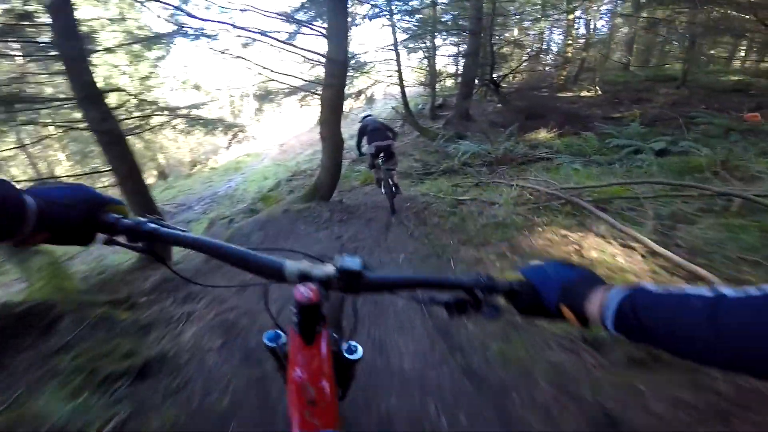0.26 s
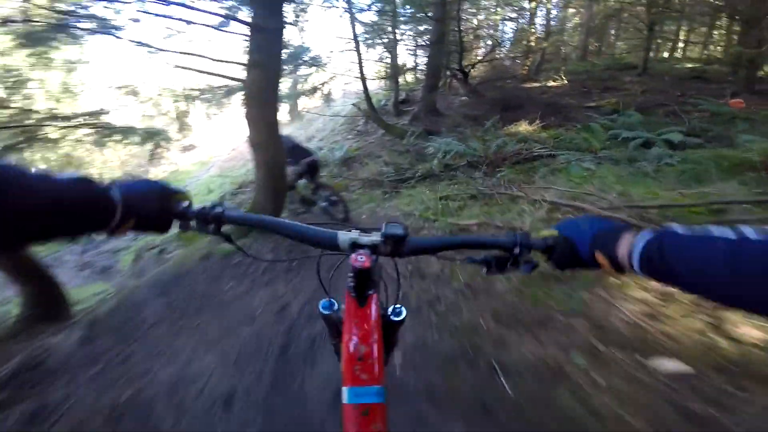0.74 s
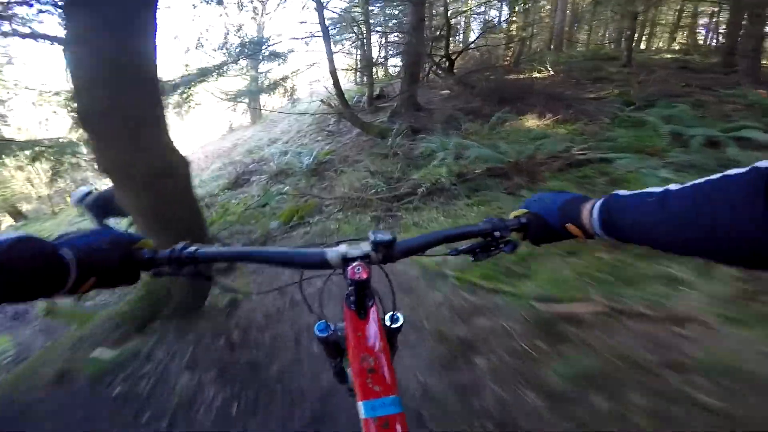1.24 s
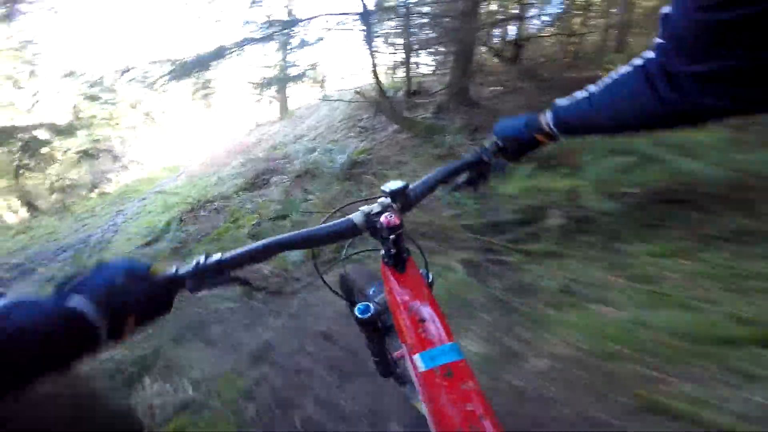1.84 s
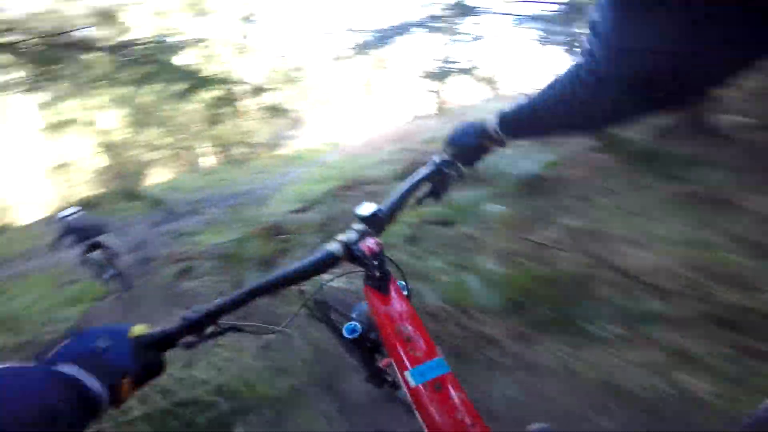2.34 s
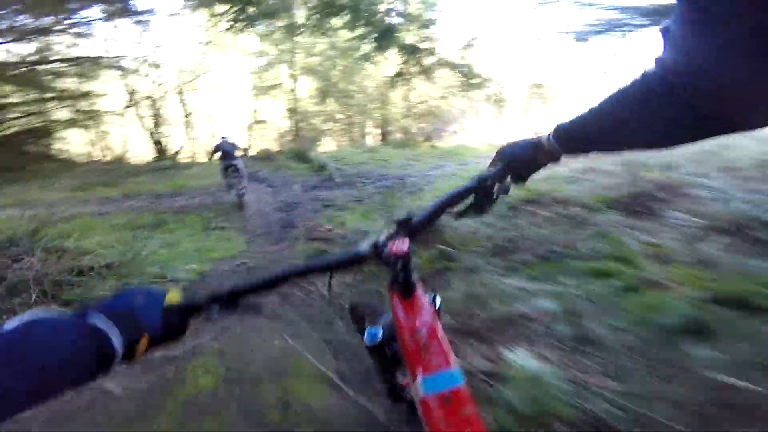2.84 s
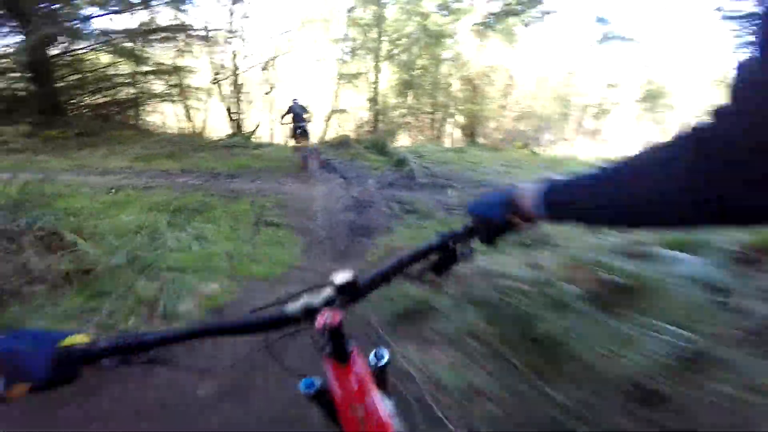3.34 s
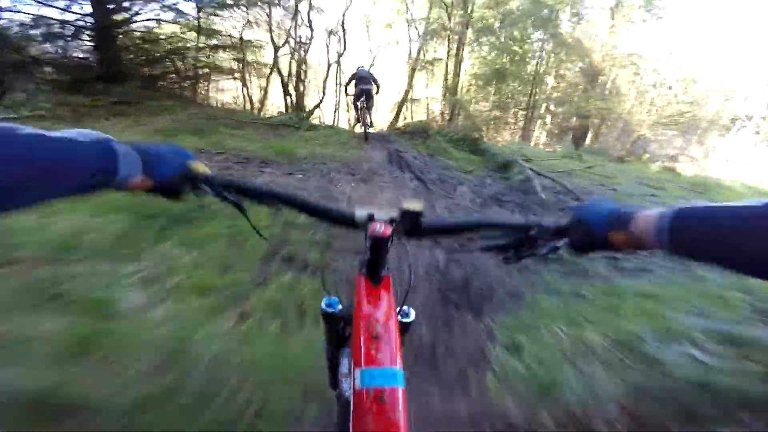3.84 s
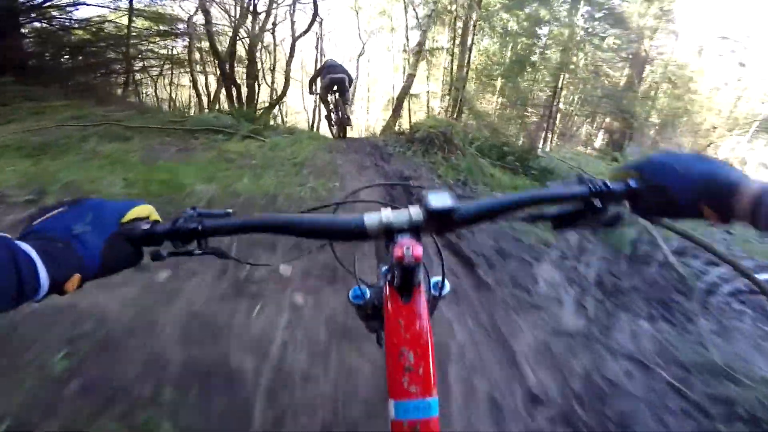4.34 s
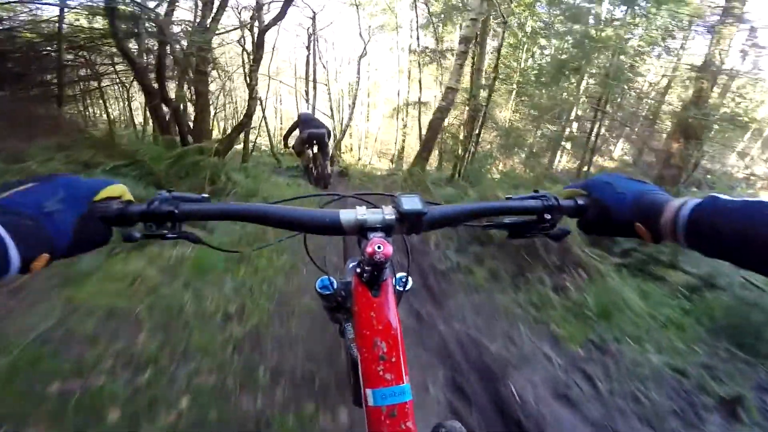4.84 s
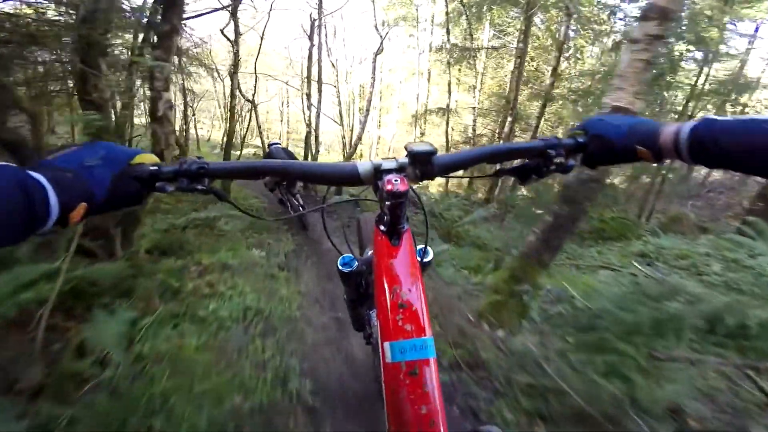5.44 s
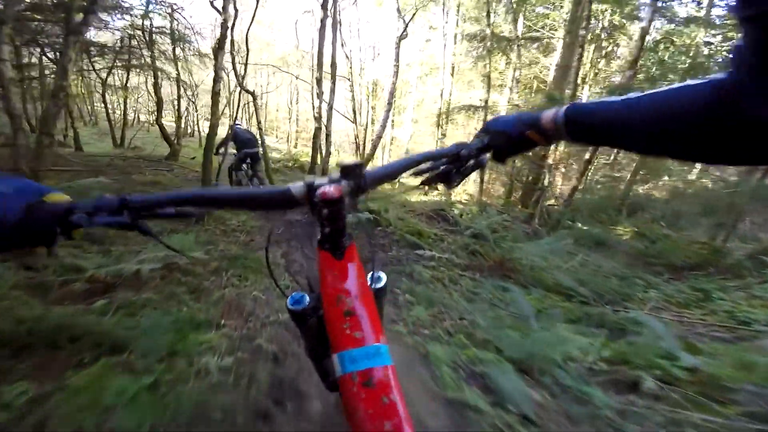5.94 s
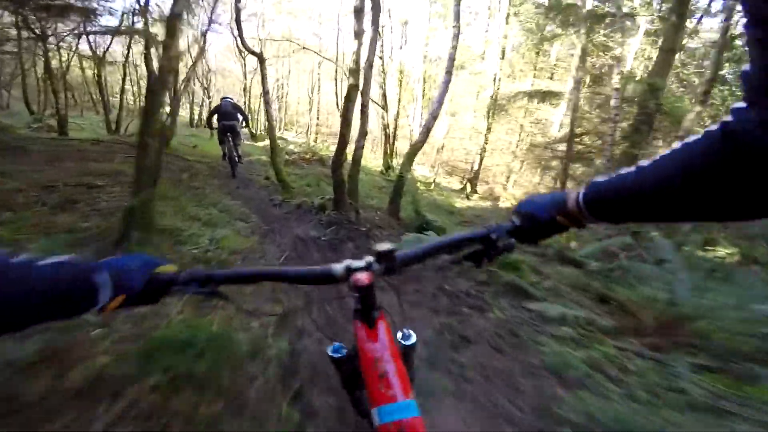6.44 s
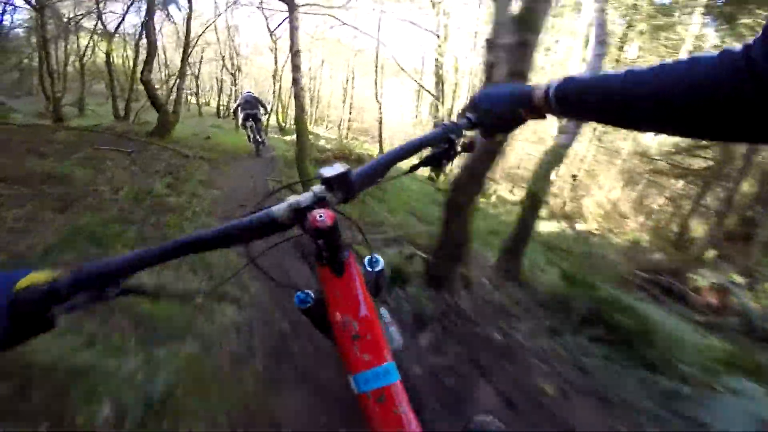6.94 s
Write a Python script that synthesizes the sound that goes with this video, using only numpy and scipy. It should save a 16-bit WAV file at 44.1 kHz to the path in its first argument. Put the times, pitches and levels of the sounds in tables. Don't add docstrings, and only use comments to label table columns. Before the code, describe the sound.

Thumping, fluttering wind dominates over faint tyre crunch and fast freehub ticks, with sharp chain slaps and a few hollow frame knocks.

```python
import sys
import numpy as np
from scipy import signal
from scipy.fft import rfft, irfft, next_fast_len
from scipy.io import wavfile
from scipy.ndimage import uniform_filter1d

SR = 44100
rng = np.random.default_rng(int(sys.argv[2]) if len(sys.argv) > 2 else 0)


def attenuation_scalar(level_db):
    decades = np.asarray(level_db, float) / 20
    return 10 ** decades


def transcribe(signal):
    frames = np.atleast_2d(signal).T
    limited = np.clip(frames, -1, 1)
    pcm = np.round(limited * 32767).astype(np.int16)
    wavfile.write(sys.argv[1], SR, pcm)


N = 317079

# time in seconds, buffeting level in dB,
# flutter of mid eddies in dB relative to it, flutter of small eddies in dB relative to it.
WIND_GUSTS = [(0.0, -25, -16, -8.5), (0.22, -15, -15, -27), (0.26, -21, -17, -15), (0.3, -7.5, -13, -29),
              (0.42, -32.5, -15, -13), (0.46, -26, -20, -21), (0.56, -16, -6, -14.5), (0.7, -13, -33, -29),
              (0.72, -18, -7.5, -26), (1.02, -13.5, -0.5, -5.5), (1.08, -22.5, 5.5, -22),
              (1.14, -10, -11, -35), (1.16, -25, -10, -25), (1.26, -19, 1, -11), (1.32, -11, -16, -37),
              (1.36, -23, -18, -22), (1.44, -12, -1.5, -19), (1.52, -20, -15, -30), (1.56, -21, 6, -28),
              (1.7, -17.5, -11.5, -18), (1.74, -25, -9, -27), (1.8, -13, 3, -4.5),
              (1.88, -11, -13.5, -26.5), (1.94, -24, -9, -12), (2.0, -12, -9.5, -29), (2.06, -12, 7, -8.5),
              (2.2, -13.5, -11, -29), (2.24, -11.5, -2, 2), (2.28, -13, 0.5, -16), (2.46, -33.5, -20, -9),
              (2.64, -12, -22.5, -26), (2.7, -26.5, 4.5, -21), (2.74, -11.5, -26, -34),
              (2.8, -29, -10, -18), (2.84, -4, -22, -36), (2.88, -28, -24, -33), (2.9, -20, 6, -13),
              (2.96, -18.5, -14.5, -18), (3.1, -31.5, -19, -12), (3.2, -22.5, -9, -7),
              (3.26, -11, -16.5, -23), (3.5, -28.5, -12, -8.5), (3.68, -14.5, -21, -29.5),
              (3.74, -29, -5, -20), (3.8, -10.5, -25, -33), (3.98, -22.5, -14, -20),
              (4.02, -12, -19.5, -25), (4.22, -19, -12, -14.5), (4.29, -32, -8, -12),
              (4.54, -31.5, -9, -10.5), (4.58, -13.5, -23, -29), (4.62, -37, -8, -13),
              (4.66, -24.5, -14, -23), (4.71, -31, -21, -16), (4.81, -13.5, -3, -36),
              (5.0, -19.5, -29, -29.5), (5.35, -23, -10, -28), (5.41, -26.5, -17, -17),
              (5.47, -15, -14.5, -31), (5.59, -15.5, -1, -19), (5.61, -17, -9.5, -27),
              (5.67, -34, -15, -17), (5.69, -10.5, -19, -33), (5.83, -24, -10.5, -22),
              (5.87, -15, -11.5, -34), (5.99, -24, -11, -16), (6.03, -9.5, -18, -35),
              (6.05, -22, -6.5, -14), (6.09, -9.5, -3.5, -14.5), (6.21, -21, -24.5, -28.5),
              (6.55, -13, -3.5, -9.5), (6.63, -27, -6, -3), (6.71, -11.5, -1, -17), (6.75, -19.5, -15, -13),
              (6.83, -14, -4.5, -7), (6.91, -16.5, -12, -18.5), (7.13, -18, -12, -15.5),
              (7.17, -4, -10, -18), (7.19, -32, -5, -2)]
# start in seconds, peak in dB, pitch in Hz, length in seconds.
AIR_POPS = [(0.286, -8.5, 308, 0.013), (0.765, -16, 300, 0.022), (0.789, -7.5, 300, 0.014),
            (0.884, -29, 300, 0.018), (0.941, -15, 300, 0.02), (1.054, -16, 302, 0.017),
            (1.103, -20.5, 300, 0.014), (1.301, -19, 298, 0.022), (1.415, -9, 303, 0.022),
            (1.55, -12.5, 297, 0.013), (1.59, -11, 297, 0.022), (1.791, -11, 300, 0.025),
            (1.999, -12, 292, 0.017), (2.227, -14, 303, 0.029), (2.244, 1.5, 296, 0.018),
            (2.505, -13.5, 310, 0.012), (2.685, -23.5, 298, 0.016), (2.822, -32, 300, 0.022),
            (2.911, -23.5, 300, 0.0081), (4.028, -23.5, 304, 0.0092), (4.831, -18.5, 298, 0.014),
            (5.303, -18, 296, 0.019), (6.142, -32, 297, 0.023), (6.368, -8.5, 300, 0.015),
            (6.506, -4.5, 297, 0.018), (6.634, -12.5, 296, 0.016), (6.688, -2.5, 298, 0.016),
            (6.806, 4, 306, 0.014), (6.983, -8.5, 296, 0.011), (7.062, -15, 300, 0.018)]
# time in seconds, tyre roll level in dB, grit spray in dB relative to it,
# ratchet in dB relative to it, ratchet ring in Hz.
WHEEL_ROLL = [(0.0, -41, -13.5, -12, 8690), (0.42, -43, -10.5, -11, 8400), (0.5, -40, -14, -7, 9180),
              (0.62, -40.5, -12.5, -13, 9380), (0.7, -40.5, -11, -22, 8600),
              (0.92, -40.5, -6.5, -4.5, 9300), (1.0, -41.5, -9, -2.5, 8900), (1.22, -41.5, -9.5, -7, 9400),
              (1.6, -42, -7.5, -16, 8640), (1.68, -43, -7.5, -9.5, 9230), (2.0, -43.5, -10, -5.5, 9190),
              (2.1, -42.5, -7, -9.5, 8600), (2.84, -40.5, -7.5, -10, 9000), (3.3, -38.5, -6.5, -16, 9200),
              (3.46, -39.5, -10, -13, 8590), (3.6, -39.5, -11, -13.5, 8960), (4.22, -38, -6, -14, 8600),
              (4.39, -39.5, -8, -12, 9270), (4.6, -42.5, -7, -8.5, 8610), (4.89, -42.5, -6, -6.5, 8940),
              (5.17, -43, -7.5, -8.5, 8640), (5.41, -41, -5.5, -8.5, 9300), (5.71, -41.5, -7.5, -8, 8650),
              (6.07, -43, -6, -10, 9100), (6.51, -33.5, -13, -17, 8540), (6.61, -39, -7, -12, 8740),
              (7.19, -41.5, -4.5, -12, 8700)]
# frequency in Hz, level in dB per Hz.
TYRE_TONE = [(180, -42), (300, -6.5), (362, -7.5), (412, -24), (601, -4), (676, -6.5), (788, -13.5),
             (951, -4), (1160, -4), (1320, -1.5), (1390, -2.5), (2560, -3), (5000, -15), (6500, -30),
             (11000, -120)]
# frequency in Hz, level in dB per Hz.
GRIT_TONE = [(2000, -37), (3500, -5.5), (5000, -1.5), (5900, -1), (6600, -3.5), (9000, -6), (13000, -11.5),
             (16000, -8.5)]
# time in seconds, count of ratchet teeth passed so far.
TEETH_PASSED = [(-0.0093, 0), (0.1704, 6), (0.354, 13), (0.4228, 16), (0.6084, 25), (0.6443, 27),
                (0.8499, 40), (1.0155, 48), (1.1053, 52), (1.4276, 70), (1.5612, 77), (1.671, 82),
                (1.8007, 89), (1.8286, 91), (1.9095, 99), (1.9434, 102), (2.0591, 111), (2.13, 116),
                (2.1689, 119), (2.2028, 122), (2.2826, 130), (2.3245, 135), (2.3993, 143), (2.4313, 147),
                (2.5011, 155), (2.5819, 163), (2.7037, 173), (2.7905, 179), (2.8743, 184), (3.0169, 195),
                (3.1826, 206), (3.3073, 215), (3.3971, 220), (3.6655, 231), (4.0137, 248), (4.299, 259),
                (4.3978, 264), (4.5145, 269), (4.5534, 271), (4.739, 282), (4.8647, 292), (4.9535, 298),
                (5.0314, 304), (5.1351, 311), (5.191, 316), (5.2638, 323), (5.3895, 333), (5.4604, 340),
                (5.5282, 346), (5.6629, 356), (5.7996, 367), (6.0421, 384), (6.3524, 409), (6.4292, 416),
                (6.4791, 421), (6.5519, 429), (6.6317, 437), (6.6856, 443), (6.7175, 447), (6.7445, 450),
                (6.8502, 461), (6.929, 470), (7.0897, 486), (7.1625, 494), (7.1825, 496), (7.1988, 497)]
# frequency in Hz, level in dB per Hz.
PAWL_TONE = [(1500, -25), (3000, -12), (5500, -6.5), (7000, -2.5), (9000, -2), (11000, -4), (12500, -6),
             (14100, -4), (16000, -7.5)]
# start in seconds, peak in dB, low ring in dB relative to the rest,
# 60 dB decay time in seconds.
CHAIN_SLAPS = [(0.0777, -24, -4, 0.03), (0.26, -24, -4, 0.03), (0.4234, -23, -4, 0.027),
               (0.4584, -24, -6, 0.03), (0.51, -20.5, -4, 0.035), (0.587, -30, -1, 0.03),
               (0.7544, -25, -4, 0.03), (0.8774, -22, -4, 0.03), (1.0058, -10, -1, 0.03),
               (1.3027, -21, -4, 0.03), (1.3936, -9.5, -6, 0.026), (1.7033, -6.5, -5, 0.025),
               (1.9696, -13, -8, 0.03), (2.0205, -10.5, -1, 0.032), (2.376, -30, -4, 0.03),
               (3.3545, -11, 4, 0.043), (3.6596, -22, -4, 0.03), (3.7295, -4.5, 2, 0.025),
               (3.7344, -5, 1, 0.028), (3.7848, -30, -4, 0.03), (3.9091, 1, -1, 0.02),
               (3.9938, -19, -4, 0.03), (4.399, -4, 2, 0.039), (4.5008, -21, -1, 0.027),
               (6.0808, 0, -12, 0.033), (6.117, -18, -2, 0.037), (6.2888, -5, -9, 0.019),
               (6.3595, -15, -4, 0.03), (6.974, -14, -1, 0.03), (7.0382, -7, -6, 0.027),
               (7.16, -6, -4, 0.032)]
# frequency in Hz, width in Hz, level in dB.
STAY_MODES = [(1500, 200, -0.5), (2500, 460, 4), (3430, 280, 5.5), (5034, 830, 11.5), (5940, 980, 4.5),
              (7820, 940, -0.5), (8900, 350, -16), (9460, 460, -7), (11700, 700, -29), (14000, 900, -19)]
# start in seconds, peak in dB, pitch in Hz,
# 60 dB decay time in seconds, crack in dB relative to the note.
TUBE_KNOCKS = [
    (2.2453, -6.5, 1024, 0.013, -34),
    (2.5068, -4.5, 1830, 0.021, -23),
    (2.5715, -25, 1850, 0.019, -16),
    (2.614, -17, 1640, 0.03, -13),
    (6.3689, -17, 2135, 0.043, -34),
    (6.3736, -10.5, 1340, 0.023, -26),
    (6.4502, -22, 1950, 0.022, -16),
    (6.8184, -17.5, 1050, 0.021, -24),
]


def evened(x):
    return x / np.sqrt(np.mean(x ** 2) + 1e-20)


def curves(rows):
    s, *columns = np.transpose(rows)
    return [np.interp(np.arange(N) / SR, s, column) for column in columns]


def coloured(x, points):
    hz, db = np.transpose(points)
    size = next_fast_len(len(x))
    log_hz = np.log(np.fft.rfftfreq(size, 1 / SR) + 1)
    gain = attenuation_scalar(np.interp(log_hz, np.log(hz), db))
    return evened(irfft(rfft(x, size) * gain, size)[:len(x)])


def drift(hz):
    span = max(int(SR / hz / 2), 1)
    once = uniform_filter1d(rng.standard_normal(N), span)
    return evened(uniform_filter1d(once, span))


def resonate(x, hz, width_hz):
    turn = np.exp(2j * np.pi * np.cumsum(hz * np.ones(len(x))) / SR)
    r = np.exp(-np.pi * width_hz / SR)
    return 2 * (turn * signal.lfilter([1 - r], [1, -r], x / turn)).real


def add(mix, s, sound):
    part = mix[round(s * SR):][:len(sound)]
    part += sound[:len(part)]


def eddies(hz, per_cycle, spread_db, cycles):
    passing = rng.random(N) < per_cycle * hz / SR
    size = rng.standard_normal(N) * attenuation_scalar(spread_db * rng.standard_normal(N))
    u = np.arange(-2.5 * cycles, 2.52 * cycles, hz / SR)
    swirl = np.sin(2 * np.pi * u) * np.exp(-(u / cycles) ** 2)
    return evened(signal.oaconvolve(passing * size, swirl, "same"))


def wind():
    big_db, mid_db, small_db = curves(WIND_GUSTS)
    flurry, quick = drift(13.5), drift(50)

    big = attenuation_scalar(-1) * eddies(27, 2.3, 0.74, 0.63)
    big += attenuation_scalar(0.5) * eddies(45, 2.5, 0.79, 0.6)
    big += attenuation_scalar(-5) * eddies(72, 2.5, 1.17, 0.5)

    mid = eddies(125, 1.9, 3.7, 0.54)
    mid += attenuation_scalar(-3) * eddies(195, 1.5, 2.9, 0.57)
    mid += attenuation_scalar(-10) * eddies(290, 1.5, 2.1, 0.59)

    small = eddies(420, 1.2, 1.9, 0.56)
    small += attenuation_scalar(-3) * eddies(620, 1.3, 2.8, 0.59)
    small += attenuation_scalar(-12) * eddies(990, 1.2, 3, 0.42)

    out = evened(big * attenuation_scalar(1.5 * flurry))
    out += attenuation_scalar(mid_db - 1.0) * evened(mid * attenuation_scalar(2.7 * flurry + 2.5 * quick))
    out += attenuation_scalar(small_db - 2.0) * evened(small * attenuation_scalar(2.95 * flurry + 3.7 * quick))
    return attenuation_scalar(big_db) * out


def air_pops():
    out = np.zeros(N)
    draws = rng.standard_normal((len(AIR_POPS), 4000))
    for (s, db, hz, length), noise in zip(AIR_POPS, draws):
        u = np.arange(4000) / SR / np.clip(length, 0.004, 0.05)
        swell = 2 * u * np.exp(1 - 2.4 * u)
        width_hz = 1.07 * hz
        burst = resonate(resonate(noise, hz, width_hz), hz, width_hz)
        add(out, s, attenuation_scalar(db - 10.5) * evened(burst) * swell)
    return out


def ratchet(ring_hz):
    s, count = np.transpose(TEETH_PASSED)
    times = np.interp(np.arange(1, count[-2]), count, s)
    jitter, size = rng.standard_normal((len(times), 2)).T
    places = ((times + 0.0005 * jitter) * SR).astype(int)
    clicks = np.zeros(N)
    clicks[np.clip(places, 0, N - 1)] = attenuation_scalar(2.05 * size)

    t = np.arange(900) / SR
    shape = (1 - np.exp(-t / 0.0008)) * (np.exp(-t / 0.0025) + 0.14 * np.exp(-t / 0.007))
    rattle = signal.oaconvolve(clicks, shape)[:N] * rng.standard_normal(N)
    shell = evened(resonate(rattle, ring_hz, 700))
    return evened(coloured(rattle, PAWL_TONE) + attenuation_scalar(-6) * shell)


def rolling():
    roll_db, grit_db, tick_db, ring_hz = curves(WHEEL_ROLL)
    bumps = drift(24.6)
    crunch = rng.standard_normal(N) * attenuation_scalar(1.58 * bumps + 2.23 * drift(160))
    grains = rng.standard_normal(N) * attenuation_scalar(0.58 * bumps + 2.5 * drift(230))
    tyres = coloured(crunch, TYRE_TONE)
    grit = attenuation_scalar(grit_db) * coloured(grains, GRIT_TONE)
    ticks = attenuation_scalar(tick_db) * ratchet(ring_hz)
    return attenuation_scalar(roll_db) * (tyres + grit + ticks)


def tube_knocks():
    out, t = np.zeros(N), np.arange(2600) / SR
    draws = rng.standard_normal((len(TUBE_KNOCKS), 2600))
    for (s, db, hz, t60, crack_db), noise in zip(TUBE_KNOCKS, draws):
        fade = (1 - np.exp(-t / 0.00032)) * attenuation_scalar(-60 * t / np.clip(t60, 0.008, 0.1))
        note = np.sin(2 * np.pi * hz * (t - 6 * t ** 2))
        note += 0.5 * evened(resonate(noise, hz, 630))
        add(out, s, attenuation_scalar(db) * fade * (note + attenuation_scalar(crack_db) * noise))
    return out


def chain_slaps():
    out, t = np.zeros(N), np.arange(2600) / SR
    draws = rng.standard_normal((len(CHAIN_SLAPS), 2600))
    for (s, db, low_db, t60), noise in zip(CHAIN_SLAPS, draws):
        strike = 0.25 * noise * attenuation_scalar(-60 * t / np.clip(t60, 0.008, 0.1))
        strike[20] += 2.5
        slap = attenuation_scalar(-18) * np.diff(strike, prepend=0)
        for hz, width_hz, mode_db in STAY_MODES:
            level = attenuation_scalar(mode_db + low_db * (hz < 2800)) * 900 / width_hz
            slap += level * resonate(strike, hz, width_hz)
        add(out, s, attenuation_scalar(db) * slap / abs(slap).max())
    return out


def scene():
    return (wind() + air_pops() + rolling() + tube_knocks() + chain_slaps())[None]


def low_pass(x):
    return signal.sosfilt(signal.butter(12, 16530, fs=SR, output="sos"), x)


def record(dry):
    x = signal.lfilter(*signal.butter(N=2, Wn=16, btype="high", fs=SR), dry)
    x = 1.114 * np.tanh(x / 1.112)
    edge = signal.firwin(numtaps=511, cutoff=15400, window=("kaiser", 9), fs=SR)
    below_edge = signal.oaconvolve(x, edge[None], "same")
    x = attenuation_scalar(-18) * x + (1 - attenuation_scalar(-31.5)) * below_edge
    return low_pass(x)


dry = scene()
out = record(dry)
transcribe(out)
```